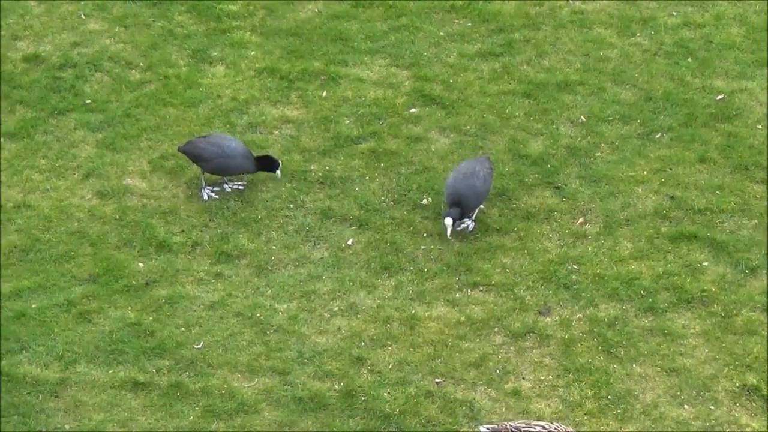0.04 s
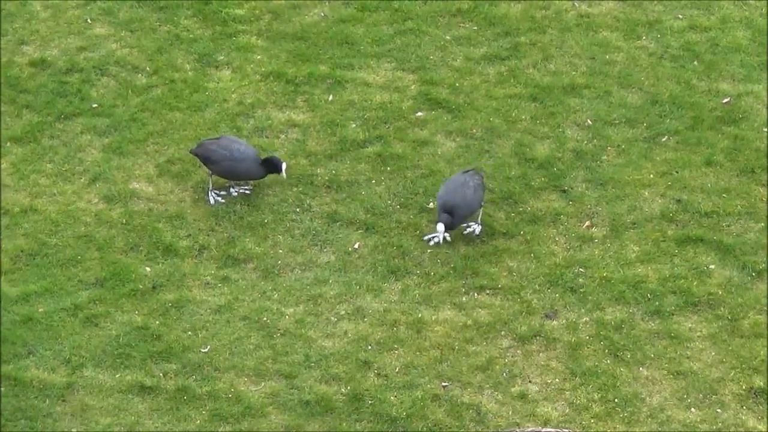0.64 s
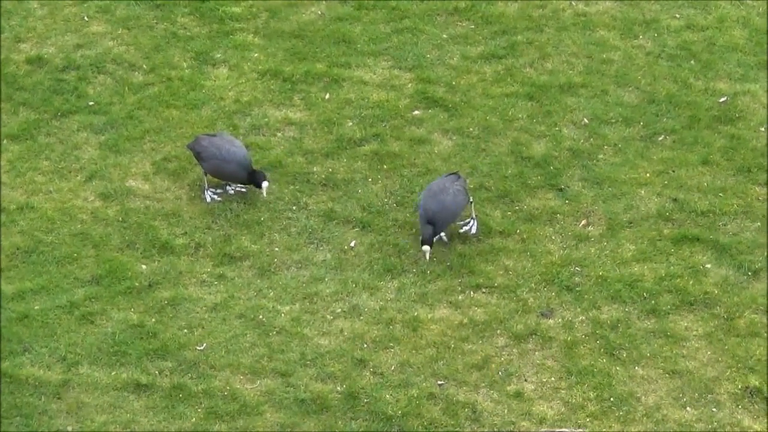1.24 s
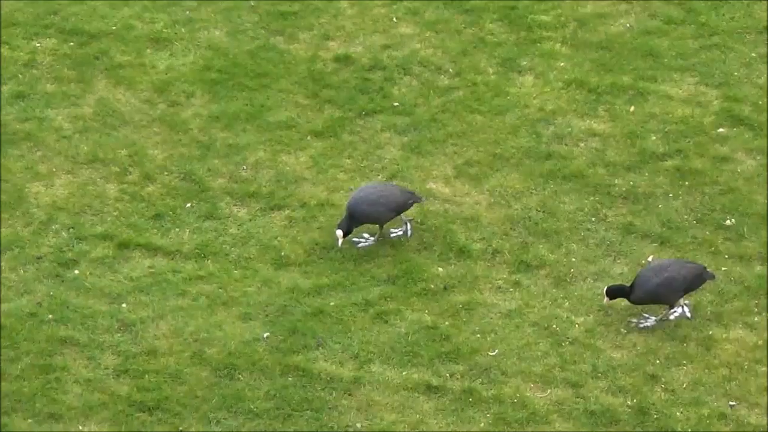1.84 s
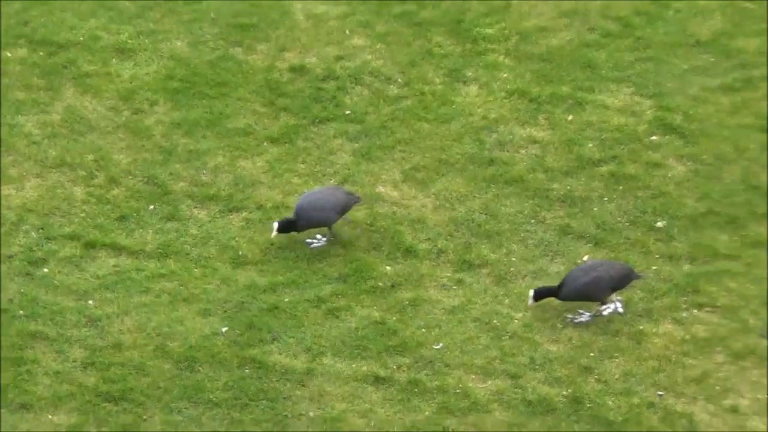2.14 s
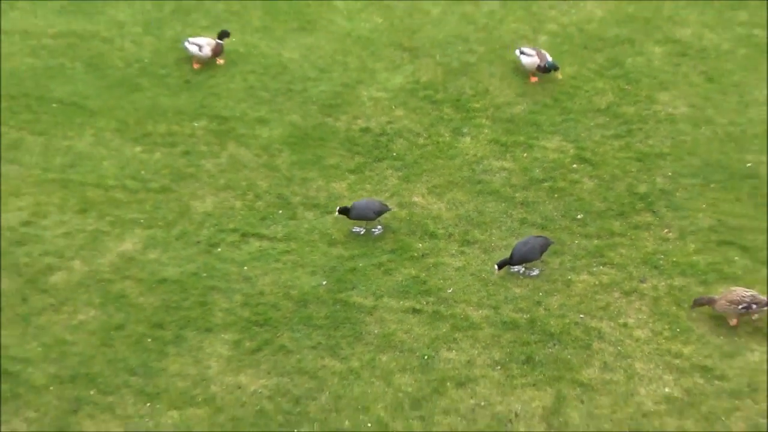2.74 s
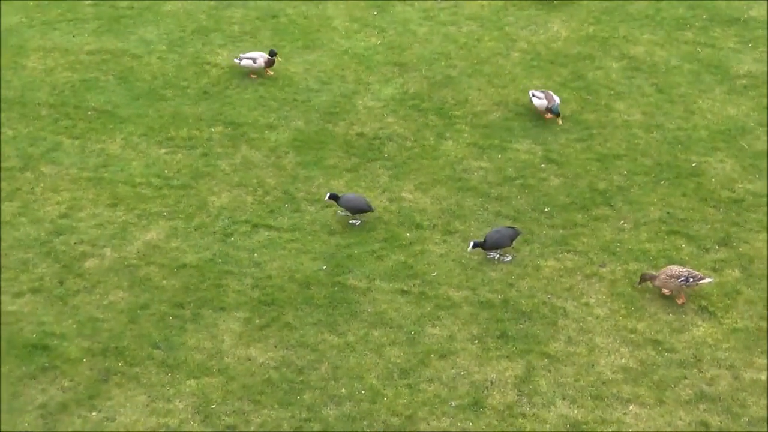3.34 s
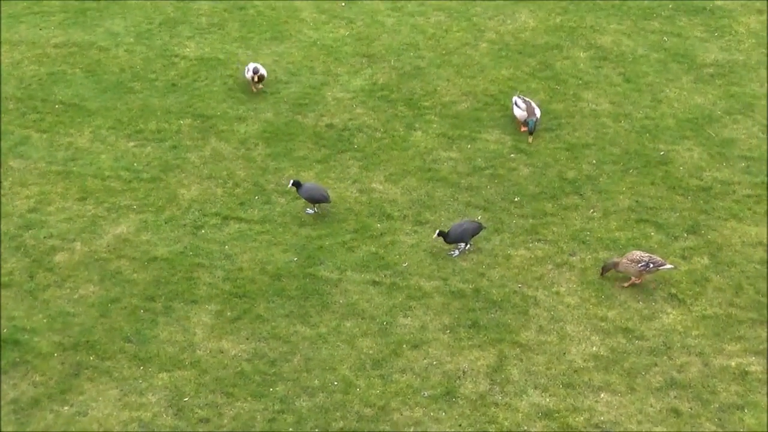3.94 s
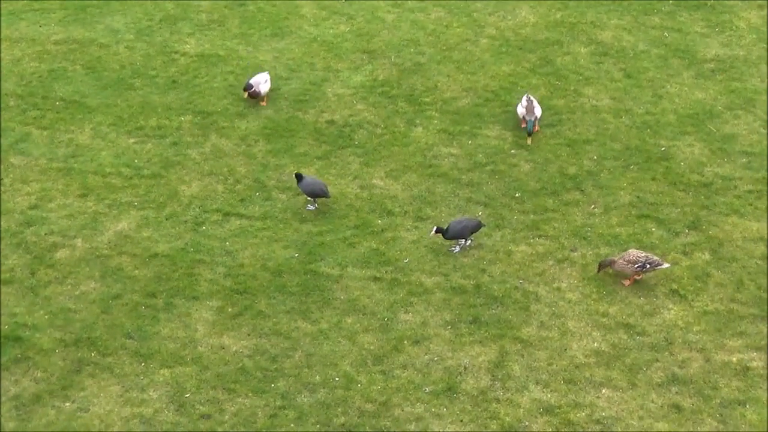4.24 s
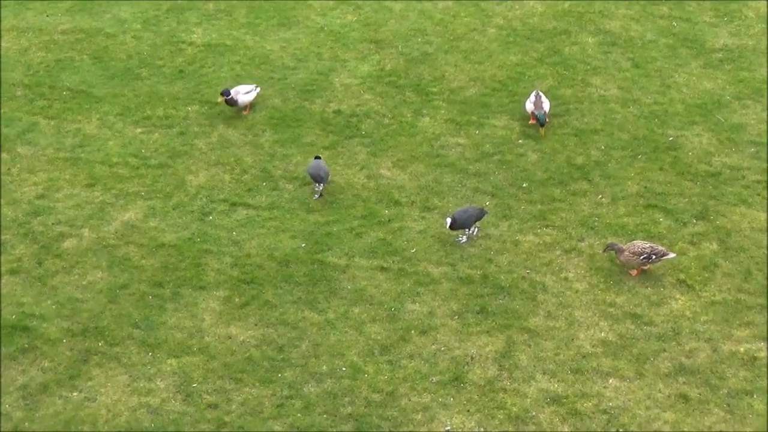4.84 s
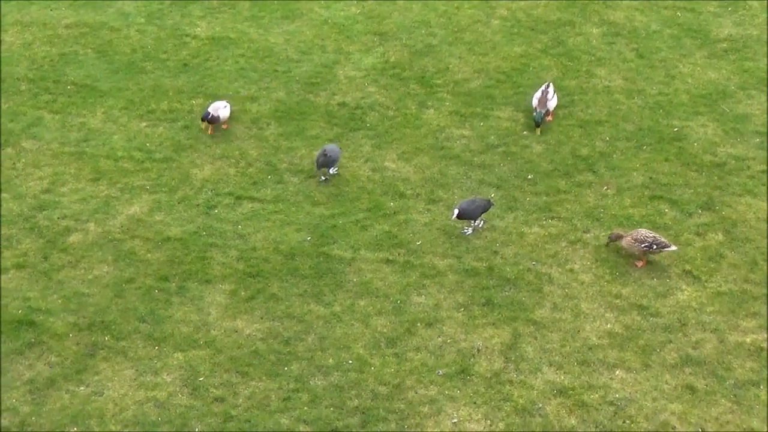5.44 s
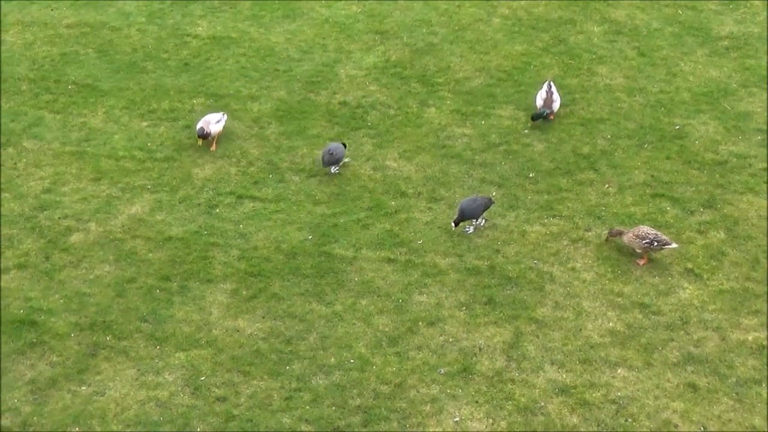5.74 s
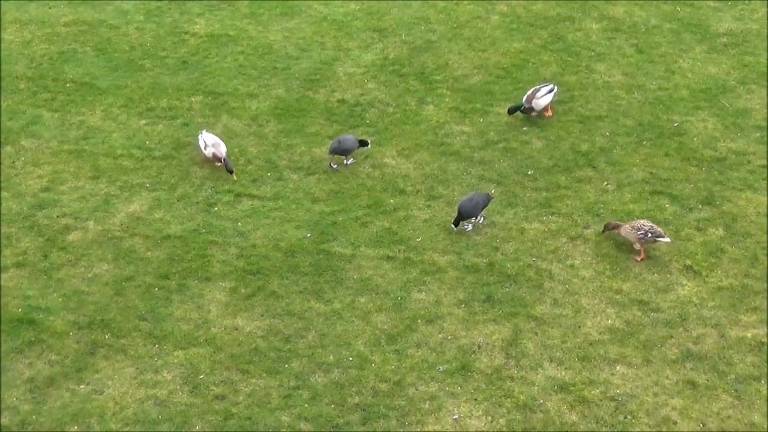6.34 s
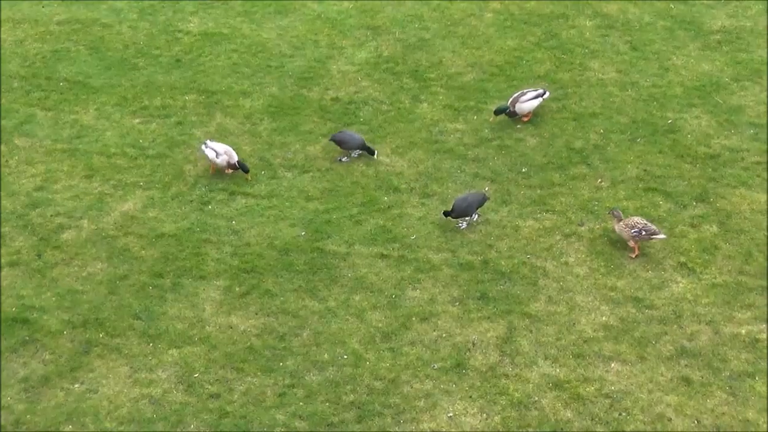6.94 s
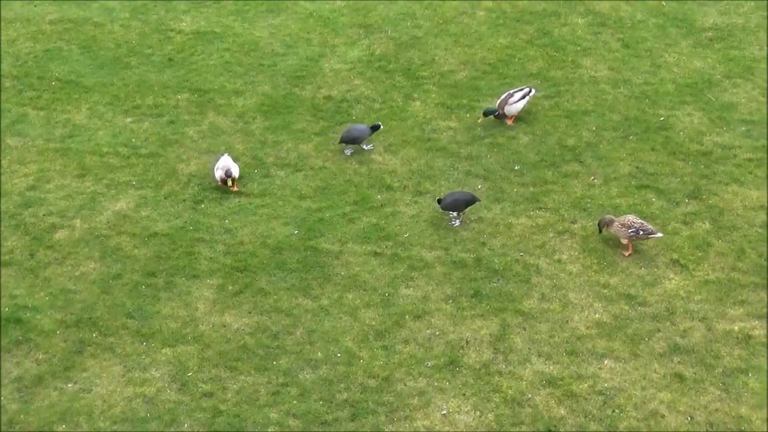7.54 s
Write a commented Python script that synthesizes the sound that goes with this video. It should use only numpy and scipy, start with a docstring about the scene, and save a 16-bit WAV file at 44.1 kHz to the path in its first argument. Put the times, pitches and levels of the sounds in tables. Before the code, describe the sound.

Wind rumbles on the microphone on a park lawn, with hard low buffets from about 1 to 1.7 seconds. A handling click comes at 1.5 seconds, followed by thin, high rising bird calls. At 1.8 seconds the sound cuts out for an instant and resumes in a lull: faint traffic murmur, a far engine hum, soft hiss, distant chirps and a few light finger ticks. A duck gives two faint, short grunts near 2.7 and 3.9 seconds. From 3.5 seconds a small bird, slightly left, sings clear whistles and buzzes that echo among trees, then quick zigzags and falling notes until 6.5 seconds. Other birds add occasional very high calls. The wind rebuilds, thumping around 5 to 5.4 seconds and again at 7.5. From about 5.5 seconds, coots and ducks tear grass in soft, crisp snaps, growing busier until the end near 7.7 seconds.

```python
"""A park lawn on a breezy day

A small bird whistles in the trees to the left; others add thin high calls, scattered by the trees.
Turbulent wind buffets the microphone ports and fingers tick on the case. Coots and ducks tear at the
grass, fibre by snapping fibre, while a far engine hums under the town's murmur and a soft hiss. The
sound breaks off for an instant and resumes in a lull, from which the wind builds again."""
import sys
import numpy as np
from scipy import signal
from scipy.fft import rfft, irfft, next_fast_len
from scipy.io import wavfile
from scipy.ndimage import uniform_filter1d, map_coordinates

SR = 44100
rng = np.random.default_rng(int(sys.argv[2]) if len(sys.argv) > 2 else 0)


def digitize_waveform(pressure):
    """Quantize a signal to 16-bit integers and store it at the path in sys.argv[1].

    Rows of a 2-D input are taken as channels; values are limited to [-1, 1].
    """
    field = np.atleast_2d(pressure).T
    bounded = np.clip(field, -1, 1)
    quanta = np.round(bounded * 32767).astype(np.int16)
    wavfile.write(sys.argv[1], SR, quanta)


N = 339129

# Hard eddies. Each row: start in seconds, peak in dB, flutter time in seconds, tilt in dB per octave.
HARD_EDDIES = [(0.981, -10.5, 0.015, 0), (1.008, -14, 0.13, -14), (1.062, -18, 0.013, -2),
               (1.196, -8.5, 0.025, -6), (1.229, -9.5, 0.12, -9), (1.247, -12, .015, 3),
               (1.297, -17.5, 0.026, -12), (1.357, -18, .02, -13), (1.397, -14.5, 0.017, -18),
               (1.423, -11, 0.024, -7), (1.63, -12, 0.049, -2), (1.672, -16, .03, -8),
               (4.932, -14, 0.034, -4), (5.026, -16.5, 0.033, -12), (5.147, -14, 0.016, -16),
               (5.241, -11.5, 0.022, 6.5), (5.274, -15.5, 0.056, -10), (5.298, -10.5, 0.057, -7),
               (5.333, -14, 0.018, -14), (5.352, -12, 0.046, -6), (5.392, -16.5, 0.026, -1),
               (7.511, -11.5, 0.055, -7), (7.556, -14.5, 0.035, -9), (7.596, -15, 0.053, -4)]
# A nearly level, fading note. Every note shape holds a pitch path in semitones at even steps,
# a vibrato depth in Hz and a level change through the note in dB.
LEVEL_SHAPE = ([-0.49, 0, -0.37], 42, -9)


def amp(db):
    """Amplitude grows tenfold for every 20 dB."""
    return 10 ** (np.asarray(db) / 20)


def unit(x):
    """Division by the rms gives a signal unit power."""
    return x / np.sqrt(np.mean(x ** 2) + 1e-20)


def along(points, hz):
    """Interpolation between (Hz, value) points on a logarithmic frequency axis."""
    knots_hz, values = np.transpose(points)
    return np.interp(np.log(hz + 1), np.log(knots_hz + 1), values)


def curve(*tables):
    """Linear interpolation of (seconds, value) points gives one value a sample."""
    seconds, values = np.vstack(tables).T
    return np.interp(np.arange(N) / SR, seconds, values)


def wobble(rate, size=N):
    """Smooth random modulation: a spline through `rate` Gaussian knots a second."""
    knots = rng.standard_normal(int(size * rate / SR) + 4)
    return map_coordinates(knots, [np.arange(size) * rate / SR])


def filtered(x, response):
    """Linear filtering multiplies the spectrum by a frequency response."""
    size = next_fast_len(x.shape[-1] + SR // 4)
    return irfft(rfft(x, size) * response(np.fft.rfftfreq(size, 1 / SR)), size)[..., :x.shape[-1]]


def add(track, start, sound):
    """Superposition: a sound adds to the track from `start` seconds on."""
    part = track[..., round(start * SR):][..., :sound.shape[-1]]
    part += sound[..., :part.shape[-1]]


def spread(pair, alike):
    """Sum and difference of two independent signals give left and right with correlation `alike`."""
    angle = np.arccos(np.clip(alike, -1, 1)) / 2
    mid, side = np.cos(angle) * pair[0], np.sin(angle) * pair[1]
    return np.array([mid + side, mid - side])


def rush(spectrum, alike):
    """Spectral shaping turns white noise into coloured stereo noise of unit power."""
    white = spread(rng.standard_normal((2, N)), alike)
    return unit(filtered(white, lambda hz: amp(along(spectrum, hz))))


def ring(spectrum, tilt_db=0, size=1024):
    """A body's minimum-phase impulse response follows from its spectrum, here tilted above 1 kHz."""
    hz = np.fft.rfftfreq(size, 1 / SR)
    cepstrum = irfft(np.log(amp(along(spectrum, hz) + tilt_db * np.log2(1 + hz / 1000))))
    cepstrum[1:size // 2] *= 2  # folding onto positive time makes the response causal
    cepstrum[size // 2 + 1:] = 0
    response = irfft(np.exp(rfft(cepstrum)))
    return response / np.linalg.norm(response)


def echo(x, t60_scale):
    """Diffuse scattering from trunks and foliage gives a decaying tail, different on each side."""
    # Decay among trees. Each row: frequency in Hz, reverberation time in seconds before scaling.
    decay_times = [(500, 0.1), (3500, 0.73), (5000, 0.55), (8000, 0.62)]
    hz, t, noise = signal.stft(rng.standard_normal((2, SR)), SR, nperseg=256)
    t60 = t60_scale * along(decay_times, hz)[:, None]
    tail = signal.istft(noise * amp(-60 * t / t60), SR, nperseg=256)[1]
    return signal.fftconvolve(x[None], tail / np.linalg.norm(tail[0]), axes=1)[:, :N]


def wind():
    """Convected turbulence: rumble and faster eddies cross the left port first, then the right."""
    # Wind before and after the break. Each row: time in seconds, strength in dB.
    gusts = [(0.0, -33.5), (0.16, -39), (0.22, -31.5), (0.44, -30), (.65, -45.5), (.78, -42), (.83, -28.5),
             (.955, -35.5), (1.0, -25), (1.176, -29.5), (1.225, -24), (1.342, -28.5), (1.414, -25.5),
             (1.5, -31), (1.62, -24.5), (1.82, -32)]
    breeze = [(1.86, -73), (3.52, -37.5), (3.56, -45.5), (3.94, -33.5), (4.54, -36), (4.62, -32),
              (4.78, -32), (4.81, -46), (4.881, -26.5), (5.01, -24.5), (5.06, -27.5), (5.3, -22),
              (5.66, -26), (5.84, -23.5), (6.33, -28), (6.76, -23.5), (7.14, -27.5), (7.59, -26),
              (7.69, -25.5)]
    # Choppiness. Each row: time in seconds, gain in dB given to the eddies and taken from the rumble.
    choppiness = [(0, -1), (1.8, -2), (2.7, 0), (4, 3), (4.7, -1), (5.35, 0.5), (5.8, 0), (6.6, -0.2),
                  (7.69, 0)]
    # Spectra of slow and fast turbulence. Each row: frequency in Hz, relative level in dB.
    rumble_spectrum = [(15, -42), (30, -8.5), (60, -1.5), (125, -1.5), (180, -5.5), (260, -21.5),
                       (500, -45.5), (1000, -91)]
    eddy_spectrum = [(60, -47), (130, -5.5), (220, 0), (310, -7), (450, -14.5), (700, -23), (1200, -36.5),
                     (3000, -52), (8000, -75)]
    stiff_breeze_db, eddy_growth = -26.5, 0.62  # eddies gain this many extra dB per dB of wind
    wake_db, wake_s, transit_s = 3.5, 0.12, 0.00083
    t = np.arange(N) / SR
    strength_db, chop_db = curve(gusts, breeze), curve(choppiness)
    # A hard eddy leaves a short wake of smaller ones.
    wake = np.max([(t >= start) * np.exp(-np.abs(t - start) / wake_s) for start, *_ in HARD_EDDIES], 0)
    eddy_db = strength_db - 5 + chop_db + eddy_growth * (strength_db - stiff_breeze_db) + wake_db * wake
    rumble = unit(amp(1.43 * wobble(14)) * rush(rumble_spectrum, alike=0.78))
    eddies = unit(amp(2.8 * wobble(45) + 1.05 * wobble(11)) * rush(eddy_spectrum, alike=0.28))
    pressure = amp(strength_db - 0.5 - chop_db) * rumble + amp(eddy_db) * eddies + slaps()
    delay_s = transit_s * np.array([[-0.5], [0.5]])
    return filtered(pressure, lambda hz: np.exp(-2j * np.pi * hz * delay_s))


def town():
    """Far traffic sums incoherently to a low murmur."""
    # The murmur's colour. Each row: frequency in Hz, relative level in dB.
    spectrum = [(25, -8), (55, 16), (100, 7.5), (200, 4), (340, -5), (600, -0.5), (1100, -6), (1600, -13.5),
                (2500, -19.5), (4000, -22), (8000, -41)]
    # Its course. Each row: time in seconds, relative level in dB.
    levels = [(0, -51.5), (1.82, -52), (1.85, -60), (2.75, -56), (4, -52), (7.69, -52)]
    return amp(curve(levels) + 7.5) * rush(spectrum, alike=0.77)


def hiss():
    """Amplitude-modulated noise: soft broadband hiss that swells briefly, as from a camera's zoom motor."""
    # The hiss's colour. Each row: frequency in Hz, relative level in dB.
    spectrum = [(500, -17), (2000, 4.5), (4000, 1.5), (6000, 1.5), (8500, 1.5), (11000, -2.5)]
    # Its course. Each row: time in seconds, relative level in dB.
    levels = [(0, -67.5), (1.7, -65.5), (1.85, -71.5), (2.3, -73), (2.72, -65), (3.23, -72), (4.15, -65),
              (4.75, -69), (5.15, -59), (5.45, -66.5), (7.69, -68)]
    return amp(curve(levels) + 7) * rush(spectrum, alike=0.55)


def engine():
    """The partials of a far engine drift in pitch together, locked to its slightly unsteady speed."""
    # The hum's partials. Each row: frequency in Hz, relative level in dB.
    partials = [(86.1, -56), (172.3, -57), (258.4, -64), (520, -69)]
    # Its course. Each row: time in seconds, gain in dB.
    gains = [(0, 8.5), (1.8, 12.5), (1.9, 0), (2.4, 0.5), (3, 0.5), (7.69, -12)]
    clock = np.cumsum(1 + 0.0062 * wobble(6)) / SR
    hum = sum(amp(db + 2.06 * wobble(4.93)) * np.sin(2 * np.pi * hz * clock) for hz, db in partials)
    return np.sqrt(2) * amp(curve(gains)) * hum


def whistle(notes, shape, buzz_hz, waver, flutter_db, edge):
    """Frequency modulation: a pure tone follows a pitch path, and fast vibrato adds buzzing sidebands."""
    voice = np.zeros(N)
    path, depth_hz, change_db = shape
    taper = np.clip(edge + depth_hz / 1000, 0.1, 1)  # buzzier notes swell in more slowly
    for start, length, hz, db in notes:
        size = int(length * SR)
        t = np.arange(size) / SR
        steps = t / length * (len(path) - 1)
        semitones = map_coordinates(np.array(path, float), [steps], mode="nearest")
        buzz = depth_hz * np.sin(2 * np.pi * buzz_hz * t + 1.13 * wobble(88, size))
        pitch = hz * np.exp2(semitones / 12) * (1 + waver * wobble(263.6, size)) + buzz
        swell = np.sqrt(signal.windows.tukey(size, taper))
        level_db = db + change_db * (t / length - 0.5) + flutter_db * wobble(126, size)
        add(voice, start, amp(level_db) * swell * np.sin(2 * np.pi * np.cumsum(pitch) / SR))
    return voice


def far_birds():
    """Beyond the critical distance, notes arrive more by scattering than by the direct path."""
    # Faint pips. Each row: start in seconds, relative level in dB.
    pip_times = [(.945, -62), (1.055, -61), (1.14, -61), (1.243, -54), (1.352, -55.5), (1.472, -59),
                 (1.58, -61), (1.7, -62)]
    # Level notes. Each row: start and length in seconds, pitch in Hz, relative level in dB.
    notes = [(1.3, 0.035, 4320, -58), (1.87, 0.031, 2950, -61), (1.93, 0.06, 2060, -60),
             (2.085, 0.04, 2960, -59), (2.12, 0.034, 2000, -60), (2.55, .05, 1900, -57),
             (2.9, 0.055, 1920, -60), (2.97, 0.046, 1826, -54), (3.17, 0.027, 2160, -54),
             (2.743, 0.018, 2030, -53), (3.024, 0.02, 2540, -48), (3.32, 0.024, 4490, -58),
             (3.59, 0.054, 5500, -53), (4.338, 0.05, 3590, -43.5), (4.43, 0.0316, 4420, -49),
             (5.78, 0.019, 3830, -42), (5.92, 0.047, 2210, -44.5), (6.065, 0.028, 4540, -49),
             (6.135, 0.071, 4280, -48), (6.395, 0.08, 4450, -51), (6.769, 0.025, 2630, -43.5)]
    pip_s, pip_hz = 0.0334, 4800
    pips = [(start, pip_s, pip_hz, db) for start, db in pip_times]
    voice = whistle(notes, LEVEL_SHAPE, buzz_hz=110, waver=0.018, flutter_db=1, edge=0.17)
    pip_shape = ([-0.64, 0, 0.84], 110, 2)  # a slight rise, laid out like LEVEL_SHAPE
    voice += whistle(pips, pip_shape, buzz_hz=140, waver=0.012, flutter_db=5.5, edge=0.4)
    return amp(-8) * voice + echo(voice, t60_scale=0.35)


def slaps():
    """A hard eddy strikes the ports as a pressure impulse with a brief flutter after it."""
    # The slap's colour. Each row: frequency in Hz, relative level in dB.
    spectrum = [(40, -20), (130, 4.5), (230, 1), (380, -6.5), (600, -9.5), (1200, -33.5), (3000, -59),
                (9000, -72)]
    track, t = np.zeros(N), np.arange(SR // 20) / SR
    for start, db, t60, tilt_db in HARD_EDDIES:
        flutter = 0.13 * rng.standard_normal(len(t)) * amp(-60 * t / t60)
        flutter[0] = 1.95  # the impulse
        push = signal.fftconvolve(flutter, ring(spectrum, tilt_db, size=4096))
        add(track, start, amp(db) * push / np.abs(push).max())
    return track


def case_clicks():
    """Structure-borne sound: knocks and rubs, as of fingers on the case, reach each port by its own path."""
    # Each row: start in seconds, relative level in dB, rattle time in seconds, tilt in dB per octave.
    knocks = [(1.542, -20.5, 0.018, 1.5), (1.545, -18.5, 0.031, -4), (1.788, -32, 0.036, 2.5),
              (2.034, -33.5, 0.017, -1.5), (2.704, -35, 0.071, -1), (2.834, -39.5, 0.2, 0.5),
              (6.249, -44, .015, 8)]
    # The case's response. Each row: frequency in Hz, gain in dB.
    case = [(150, -26), (370, -3), (550, -8), (1000, 3), (1400, 0), (2000, -1.5), (3000, -11.5),
            (5000, -11.5), (7000, -20), (11000, -24)]
    track, t = np.zeros((2, N)), np.arange(SR // 10) / SR
    for start, db, t60, tilt_db in knocks:
        rattle = 0.57 * rng.standard_normal((2, len(t))) * amp(-60 * t / t60)
        rattle[:, 0] = 1.9  # the impact, common to both ports
        add(track, start, amp(db) * signal.fftconvolve(rattle, ring(case, tilt_db)[None], axes=1))
    return track


def high_callers():
    """Thin gliding tones, almost equally strong on both sides, are heard from nearly straight ahead."""
    # Rising and dipping calls. Each row: start and length in seconds, pitch in Hz, relative level in dB.
    rises = [(1.553, 0.062, 6420, -49), (1.605, 0.083, 6590, -41.5), (1.63, 0.085, 7000, -46)]
    dips = [(3.492, 0.058, 6650, -56), (3.549, 0.044, 6740, -55), (3.595, 0.044, 7050, -53),
            (3.64, 0.036, 6900, -49)]
    # Arched calls. Each row: start and length in seconds, relative level in dB.
    arch_times = [(4.954, 0.086, -47), (5.844, 0.089, -43), (6.813, .125, -49.5), (7.65, 0.075, -48)]
    # Scoops up to a drooping whistle. Each row: start in seconds, relative level in dB.
    scoop_times = [(2.364, -54), (2.672, -53.5)]
    # Note shapes. Each holds a path in semitones, vibrato depth in Hz and level change in dB.
    rise_shape = ([0.58, -0.28, 0, 0.116, 0.061], 61, -8)
    dip_shape = ([1.13, 0.35, -0.29, -0.7], 30, 1)
    arch_shape = ([-0.67, -0.1, 0, -0.16, -1.46], 30, -2)
    scoop_shape = ([-6, -3.6, 0.1, 0.25, 0.05, -0.1, -0.25], 5, 4)
    arch_hz, onset_s, onset_hz = 8290, 0.11, 8200  # each arch starts from a soft level note
    scoop_s, scoop_hz = 0.085, 4490
    arches = [(start, length, arch_hz, db) for start, length, db in arch_times]
    onsets = [(start - onset_s, onset_s, onset_hz, db - 24) for start, _, db in arch_times]
    scoops = [(start, scoop_s, scoop_hz, db) for start, db in scoop_times]
    calls = [(arches, arch_shape), (rises, rise_shape), (dips, dip_shape), (onsets, LEVEL_SHAPE)]
    voice = sum(whistle(*call, buzz_hz=145, waver=0.0102, flutter_db=1.5, edge=0.56) for call in calls)
    thin = whistle(scoops, scoop_shape, buzz_hz=147, waver=0.002, flutter_db=1, edge=0.3)
    scattered = spread(echo(voice + amp(-3) * thin, t60_scale=0.55), alike=0.6)
    return (voice + thin + amp(0.5) * scattered) * amp([[-0.5], [-1.8]])


def snaps(size, hz, rate):
    """Each breaking grass fibre rings as a damped oscillator with its own pitch and strength."""
    life_cycles, pitch_scatter, uneven_db = 23.3, 0.14, 3.5
    t = np.arange(SR // 200) / SR
    count = int(size * rate / SR) + 1
    pitch, strength = rng.standard_normal((count, 2)).T
    cycles = hz * np.exp(pitch_scatter * pitch)[:, None] * t
    rings = amp(uneven_db * strength[:, None] - 60 * cycles / life_cycles) * np.sin(2 * np.pi * cycles)
    samples = rng.integers(0, size, count)[:, None] + np.arange(len(t))
    return unit(np.bincount(samples.ravel(), rings.ravel(), size)[:size])


def crackle(size, rate=1500, uneven_db=4.5):
    """Shot noise: splitting blades give dry, wide-band ticks at random times and unequal strengths."""
    # A tick's colour. Each row: frequency in Hz, relative level in dB.
    spectrum = [(300, -6), (700, -2), (1100, 4), (2500, 1.5), (3400, -7.5), (4300, -6), (6000, -11),
                (11000, -20.5)]
    ticks = (rng.random(size) < rate / SR) * rng.choice([-1, 1], size)
    strengths = amp(uneven_db * rng.standard_normal(size))
    return unit(signal.fftconvolve(ticks * strengths, ring(spectrum))[:size])


def grazing():
    """Progressive fracture: a tuft strains, tears in a burst of snaps and trails off in stray ones."""
    # Torn tufts. Each row: start and length in seconds, pitch in Hz, relative level in dB,
    # crackle in dB against the snaps.
    tufts = [(2.629, 0.04, 2000, -57, -8), (2.725, 0.027, 2240, -48.5, -13), (2.901, .14, 2100, -53.5, -7),
             (3.142, 0.068, 2100, -55.5, -1.5), (3.885, 0.042, 1780, -49, 0),
             (5.551, 0.0076, 1810, -41, -22), (5.632, 0.024, 1970, -41.5, -9),
             (5.772, 0.029, 1770, -42.5, 1.5), (6.264, 0.015, 1880, -43.5, -11),
             (6.357, 0.02, 1870, -39.5, -17.5), (6.424, 0.016, 1850, -42, -14),
             (6.512, 0.024, 1930, -38.5, -15), (6.61, 0.021, 1824, -38.5, -17),
             (6.83, 0.036, 1650, -44.5, -3.5), (6.984, 0.0094, 1870, -39.5, -6),
             (6.998, 0.011, 1950, -34.5, -8), (7.06, 0.031, 1950, -36.5, -9.5),
             (7.103, 0.029, 1880, -45.5, -10), (7.166, 0.0091, 1790, -46, 0),
             (7.235, 0.014, 1930, -37, -22), (7.335, 0.026, 1870, -36, -23), (7.37, 0.016, 1950, -45, -12),
             (7.418, 0.013, 1900, -42.5, -15), (7.518, 0.022, 1880, -44, -19),
             (7.604, 0.019, 1930, -39, -9), (7.63, 0.015, 1890, -31, -8)]
    # The rest of the flock, growing busier. Each row: time in seconds, relative level in dB.
    flock_levels = [(0, -70), (1.85, -62.5), (2.8, -62.5), (3.45, -64.5), (4.8, -57.5), (5.6, -57),
                    (6, -50), (7.69, -53.5)]
    # The bill's hollow resonance. Each row: frequency in Hz, gain in dB.
    bill = [(500, 0.5), (1100, 0.5), (1450, -4.5), (1800, -0.5), (1970, -0.5), (2180, -5.5), (2450, -3),
            (3000, -0.5), (4200, -1.5), (8000, -2.5)]
    pull_s, tear_edge_s, stray_s = 0.15, 0.0019, 0.015
    track, size = np.zeros(N), SR // 2
    t = np.arange(size) / SR - pull_s
    for start, length, hz, db, crackle_db in tufts:
        outside_s = np.maximum(np.maximum(-t, t - length), 0)  # time before or after the tear
        burst = snaps(size, hz, rate=1600) + amp(crackle_db) * crackle(size)
        tear = np.exp(-outside_s / tear_edge_s) * burst
        strays = amp(-13) * np.exp(-outside_s / stray_s) * snaps(size, hz, rate=590)
        add(track, start - pull_s, amp(db) * (tear + strays))
    flock_db = curve(flock_levels) + 3 * wobble(18)
    track += amp(flock_db) * (snaps(N, hz=1920, rate=800) + amp(-6.5) * crackle(N))
    track = signal.fftconvolve(track, ring(bill))[:N]
    return track + amp(-4.5) * spread(echo(track, t60_scale=0.62), alike=0.24)


def duck_grunts():
    """A feeding duck's grunt is a short harmonic series, each overtone weaker than the last."""
    # Each row: start in seconds, level of the fundamental in dB.
    grunts = [(2.705, -49), (3.88, -46.5)]
    length_s, pitch_hz, step_db = 0.054, 382, -3.5
    partials = [(start, length_s, (k + 1) * pitch_hz, db + k * step_db)
                for start, db in grunts for k in range(3)]
    return whistle(partials, LEVEL_SHAPE, buzz_hz=70, waver=0.054, flutter_db=4.5, edge=0.38)


def songbird():
    """Clear whistles, then quick zigzags and slurs, reverberate among near branches and far trees."""
    # A short high lead, then a long glide. Each row: glide start and length in seconds, lead pitch
    # in Hz and relative level in dB, glide pitch in Hz and relative level in dB.
    two_part = [(3.504, 0.053, 3700, -41.5, 3126, -39.5), (3.817, 0.077, 4300, -37, 3184, -37.5),
                (4.193, .077, 4327, -42.5, 3136, -36.5)]
    # Buzzes and hoarse rasps. Each row: start and length in seconds, pitch in Hz, relative level in dB.
    buzzes = [(3.629, 0.097, 4850, -38.5), (3.972, 0.108, 4935, -42.5)]
    rasps = [(4.756, 0.049, 3960, -42), (5.367, 0.016, 4950, -53), (5.381, 0.028, 4190, -39.5),
             (5.393, 0.02, 3390, -40), (5.486, 0.023, 3950, -38.5)]
    # Kinked upward sweeps and scratchy falls. Each row: start in seconds, relative level in dB.
    sweep_times = [(4.844, -39), (4.938, -38.5), (5.049, -38)]
    zigzag_times = [(5.151, -34.5), (5.262, -35.5)]
    # Slurs. Each row: start and length in seconds, pitch in Hz, fall in semitones, relative level in dB.
    slur_notes = [(5.301, 0.012, 2865, 3.3, -39.5), (5.692, 0.03, 3750, 2.1, -43.5),
                  (6.035, 0.021, 4140, 2.6, -37.5), (6.061, 0.025, 3596, 2.7, -35),
                  (6.086, 0.044, 3560, 2.63, -33.5), (6.13, 0.028, 3430, 0.6, -39),
                  (6.154, 0.0267, 3085, 3.9, -38), (6.246, 0.0247, 2970, 2.4, -43),
                  (6.332, 0.032, 2750, 1.3, -44), (6.398, 0.07, 3370, 4.75, -40.5)]
    slur_path = [0.526, 0.162, -0.061, -0.233, -0.5]  # pitch as a share of the fall, at even steps
    # Note shapes. Each holds a path in semitones, vibrato depth in Hz and level change in dB.
    lead_shape = ([-2, 0, 0.2, 0.1, 0, -0.1, 0, 0.6], 15, 1)
    glide_shape = ([3.2, 1.1, 0.6, 0.2, -0.1, -0.4, -0.6, -0.7], 15, -1)
    buzz_shape = ([-1.5, 0.3, 0.36, 0.24, 0.25, -0.5], 280, -1)
    sweep_shape = ([-4.5, -0.5, -0.5, 3, -0.9, 0.3, 5, 6.5], 160, -5)
    zigzag_shape = ([2, 1.5, -0.3, 1.5, -1.4, -2, -2.5], 70, -1)
    lead_s, sweep_s, sweep_hz, zigzag_s, zigzag_hz = 0.029, 0.033, 3830, 0.032, 3430
    slur_depth_hz, slur_change_db = 85, -1
    leads = [(start - lead_s, lead_s, hz, db) for start, _, hz, db, _, _ in two_part]
    glides = [(start, length, hz, db) for start, length, _, _, hz, db in two_part]
    sweeps = [(start, sweep_s, sweep_hz, db) for start, db in sweep_times]
    zigzags = [(start, zigzag_s, zigzag_hz, db) for start, db in zigzag_times]
    slurs = [([(start, length, hz, db)], (fall * np.array(slur_path), slur_depth_hz, slur_change_db))
             for start, length, hz, fall, db in slur_notes]
    clear = [(leads, lead_shape), (glides, glide_shape), (buzzes, buzz_shape)]
    quick = [(sweeps, sweep_shape), (zigzags, zigzag_shape)] + slurs
    opening = sum(whistle(*part, buzz_hz=190, waver=0.005, flutter_db=1, edge=0.15) for part in clear)
    close = sum(whistle(*part, buzz_hz=129.7, waver=0.017, flutter_db=2.5, edge=0.17) for part in quick)
    close += whistle(rasps, buzz_shape, buzz_hz=125.4, waver=0.026, flutter_db=0, edge=0.067)
    direct = amp(4) * opening + amp(-2) * close
    branches = echo(amp(2) * opening + amp(0.5) * close, t60_scale=0.39)
    trees = echo(opening + close, t60_scale=2.57)
    return (direct + branches + trees) * amp([[-1], [-4.8]])  # louder on the left


def scene():
    """The pressures of all sources on the lawn add linearly."""
    birds = songbird() + high_callers() + far_birds() + grazing() + duck_grunts()
    return birds + case_clicks() + wind() + town() + hiss() + engine()


def record(dry):
    """A soft-edged gate cuts the sound for an instant, and a low-pass filter limits the band."""
    break_start_s, break_end_s, top_hz = 1.824, 1.844, 11150
    t = np.arange(N) / SR
    gate = uniform_filter1d(1.0 * ((t < break_start_s) | (t > break_end_s)), size=128)
    return filtered(dry * gate, lambda hz: hz < top_hz)


dry = scene()
out = record(dry)
digitize_waveform(out)
```